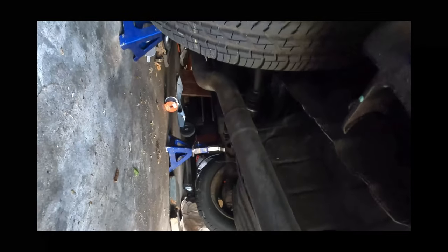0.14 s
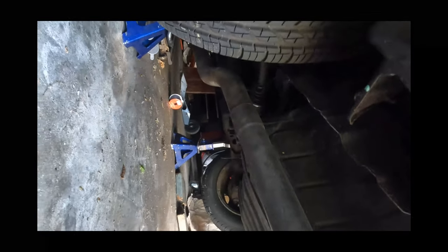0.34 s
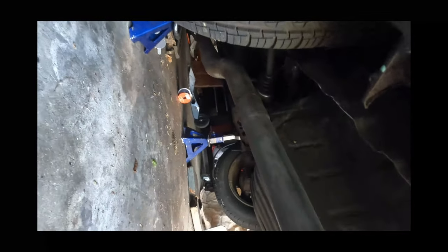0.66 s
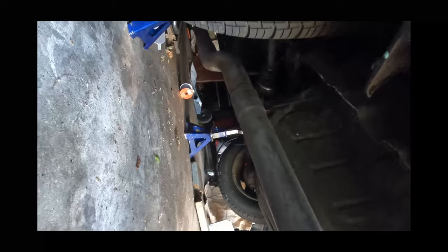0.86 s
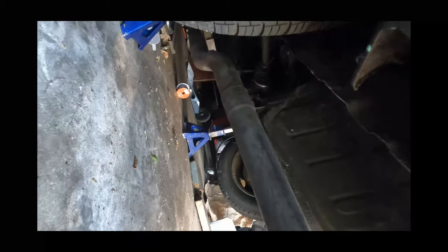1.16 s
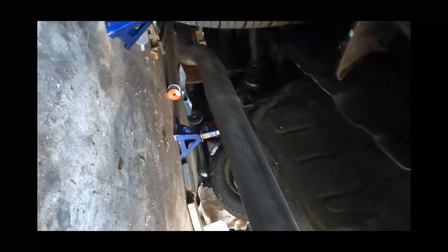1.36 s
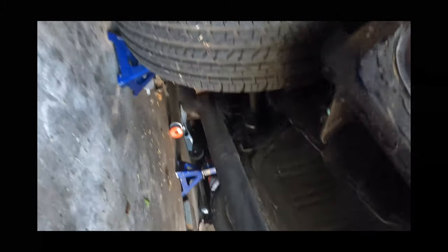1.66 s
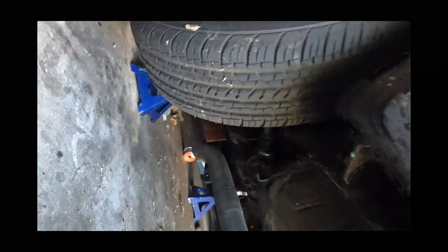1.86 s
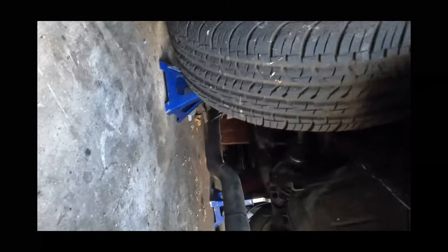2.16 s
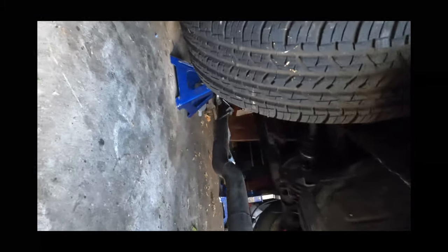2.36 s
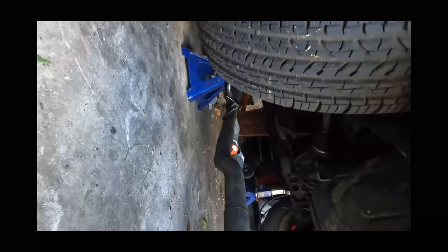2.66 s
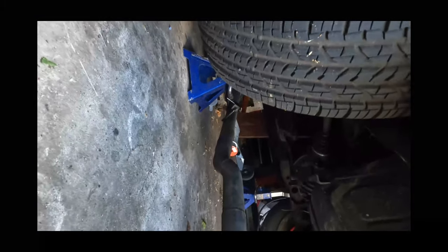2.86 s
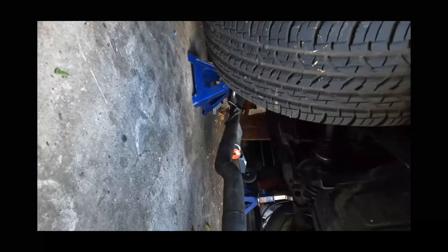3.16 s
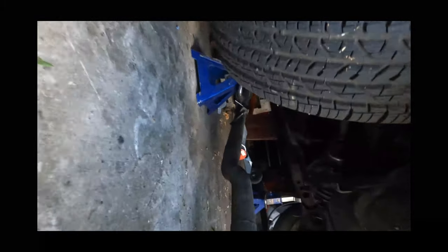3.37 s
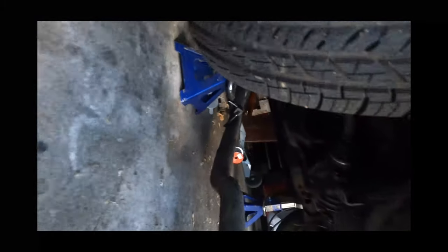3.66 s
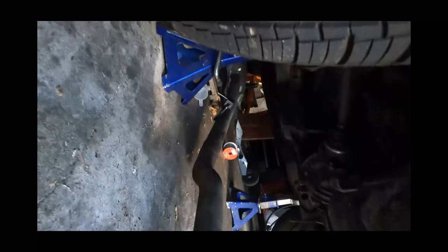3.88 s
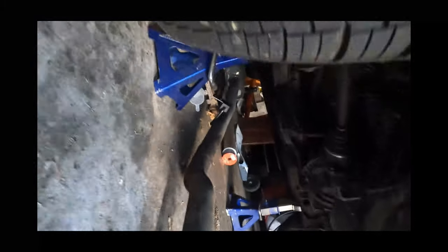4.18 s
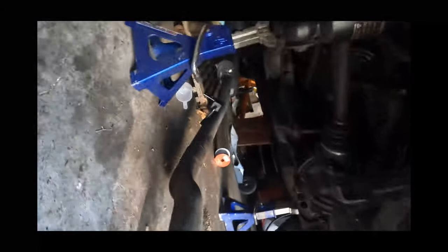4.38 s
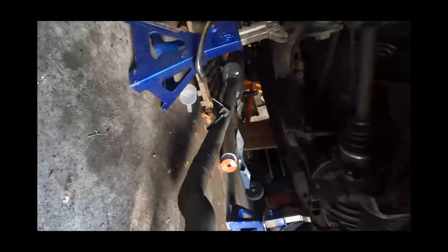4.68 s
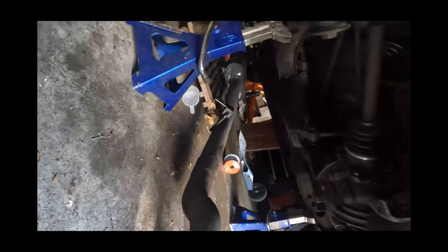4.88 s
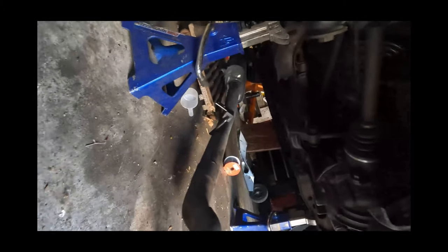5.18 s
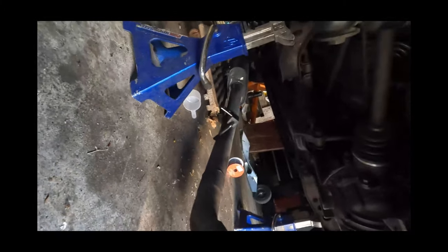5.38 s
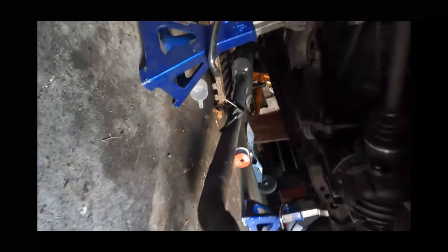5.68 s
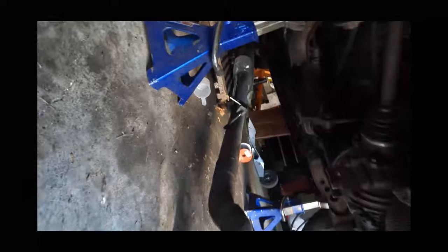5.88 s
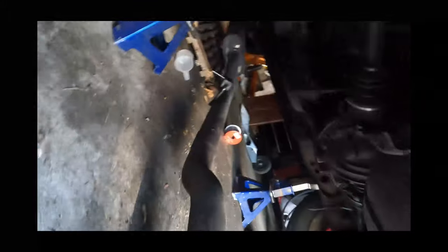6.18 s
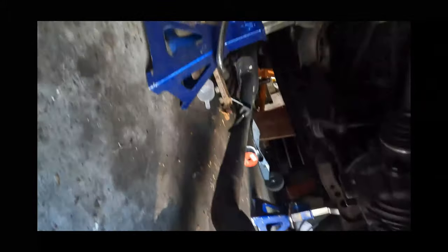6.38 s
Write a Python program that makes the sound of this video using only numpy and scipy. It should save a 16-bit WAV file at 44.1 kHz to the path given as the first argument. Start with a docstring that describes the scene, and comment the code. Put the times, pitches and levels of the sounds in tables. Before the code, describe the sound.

Close up under a car in a small garage, a long steel pipe is worked loose. Soft bumps and faint high chirps come first, then sharp metallic clanks and a brief piercing shriek. Rusty rubbing and dull thuds follow, a hollow boom near the middle, then heavy clanks and coarse scrapes over concrete. Quiet air and a short room tail surround it.

```python
"""A steel exhaust pipe is twisted out of its joint under a car, knocks about and is dragged over a garage floor.
The pipe booms in decaying low modes when it bumps; it clanks in bursts of tiny impacts when it meets metal.
The tight joint chirps, whistles, squeaks and shrieks: stick-slip drives a few unsteady sine modes.
Rusty steel rubs and sings hoarsely, and pulls over concrete end the job: all are coloured random grains.
A low hum of the pipe and a steady bed of air lie beneath, and bumps, clanks and friction ring in the garage."""
import sys
import numpy as np
from scipy import signal
from scipy.fft import rfft, irfft
from scipy.io import wavfile
from scipy.ndimage import uniform_filter1d

SR = 44100
rng = np.random.default_rng(int(sys.argv[2]) if len(sys.argv) > 2 else 0)


def transcribe(u):
    """Save the signal u as a 16-bit wav file named by the first command-line argument.

    u: samples, shape (n,) or (channels, n), limited to [-1, 1]; the rate is SR.
    q: integer samples, one column per channel.
    """
    v = np.clip(np.atleast_2d(u).T, -1, 1)
    q = np.round(v * 32767).astype(np.int16)
    wavfile.write(sys.argv[1], SR, q)


N = 288414
TIME = np.arange(N) / SR
RUB_RISE_DB_PER_S, RUB_FALL_DB_PER_S = 435, 310  # shared by rubbing and singing rust

# The pipe's low modes: pitch_hz, relative level_db, t60_s
PIPE_MODES = [(122, -13.5, 0.63), (155, -2.5, 0.25), (179, -20, 0.99), (202.7, 0, 0.13), (236, -10, 0.56),
              (262, 3, 0.079), (280, 0, 0.09), (320, -6, 0.15), (377, -13.5, 0.25), (445.7, -4.5, 0.089),
              (462.4, -6.5, 0.17), (545, -24, 0.24), (596.7, 4, 0.073), (650, 8, 0.052), (744, -20.5, 0.33),
              (806, -12.5, 0.21), (1003, 0, 0.075), (1194, -7, .16)]
# Dense ringing of the pipe's thin wall: frequency_hz, relative level_db
WALL_SPECTRUM = [(60, -18), (150, 1), (300, -5), (600, 2), (900, -3), (1300, -4), (1650, -1.5),
                 (2200, -2.5), (3000, -0.5), (4500, 0), (7000, -3.5), (8800, -14.5), (10000, -8.5),
                 (11300, 1.5), (13000, -16.5), (14000, -24)]


def amp(db):
    """Decibels to gain."""
    return 10 ** (np.asarray(db) / 20)


def unit(x):
    """Scales to rms 1."""
    return x / np.sqrt(np.mean(x ** 2) + 1e-20)


def read(points, hz):
    """Reads a spectrum on a log-frequency axis."""
    f, value = np.transpose(points)
    return np.interp(np.log(hz + 1), np.log(f + 1), value)


def shaped(x, gain):
    """Causal minimum-phase filter whose magnitude is the function gain(Hz)."""
    size = 4096
    hz = abs(np.fft.fftfreq(size, 1 / SR))
    log_gain = np.log(np.maximum(gain(hz), 1e-5))
    taps = np.fft.ifft(np.exp(np.conj(signal.hilbert(log_gain)))).real
    return signal.oaconvolve(x, taps[:size // 2])[:len(x)]


def wander(count, hz):
    """Smooth random drift of rms 1, with its spectrum rolling off around hz."""
    f = np.fft.rfftfreq(count, 1 / SR)
    noise = rfft(rng.standard_normal(count))
    return unit(irfft(noise * np.exp(-(f / hz) ** 2), count))


def add(mix, s, sound):
    """Lays a sound into the mix at time s."""
    part = mix[max(round(s * SR), 0):][:len(sound)]
    part += sound[:len(part)]


def garage(x, wet_db):
    """Adds a diffuse noise tail in which each band dies at its own speed."""
    # Reverberation of the garage: frequency_hz, t60_s
    band_t60 = [(100, 0.27), (300, 0.33), (1000, 0.16), (3000, 0.19), (7000, 0.13), (13000, 0.22)]
    hz, t, z = signal.stft(rng.standard_normal(SR * 3 // 4), SR, nperseg=256)
    decay = amp(-60 * t / read(band_t60, hz)[:, None])
    build_up = 1 - np.exp(-t / 0.022)
    tail = signal.istft(z * decay * build_up, SR, nperseg=256)[1]
    return x + amp(wet_db) * signal.oaconvolve(x, tail / np.linalg.norm(tail))[:len(x)]


def air():
    """Steady filtered noise gives the garage its quiet air."""
    # Colour of the air: frequency_hz, relative level_db
    air_colour = [(15, -61), (25, -11.5), (122, 2), (177, -17), (257, -9.5), (448, -4.5), (2710, -15),
                  (7820, -42), (11900, -23), (14000, -80)]
    noise = rng.standard_normal(N)
    return amp(-64.5) * unit(shaped(noise, lambda f: amp(read(air_colour, f))))


def low_hum(level_db=-4, width_hz=9):
    """The pipe's lowest modes hum softly, rising and falling: noise through narrow resonances."""
    # Hum under the bumps, ahead of the overall level: time_s, level_db
    hum_levels = [(0.0, -35), (0.16, -42.5), (0.42, -55), (0.98, -64.5), (1.44, -45.5), (1.73, -59.5),
                  (2.68, -51), (2.97, -68), (3.99, -47), (4.13, -50), (4.39, -52.5), (4.83, -32.5),
                  (5.06, -52.5), (5.28, -52), (5.39, -58), (5.99, -50.5), (6.45, -42), (6.54, -50.5)]

    def modes(f):
        peaks = sum(amp(db) / (1 + ((f - hz) / width_hz) ** 2) for hz, db, _ in PIPE_MODES)
        return peaks / (1 + (f / 230) ** 4)

    hum = unit(shaped(rng.standard_normal(N), modes))
    return hum * amp(level_db + np.interp(TIME, *np.transpose(hum_levels)))


def strokes(rows, rise_db_per_s, fall_db_per_s, grind_db, hiss_db):
    """Levels of grinding, rasp and fine hiss: each stroke fades up, swells or eases, then dies away."""
    power = np.zeros((3, N))
    for s, length, level_db, swell_db, bright_db in rows:
        near = abs(TIME - s) < 1
        t = TIME[near] - s
        held_db = level_db + swell_db * (np.clip(t / length, 0, 1) - 0.5)
        fade_in_db = rise_db_per_s * np.maximum(-t, 0)
        fade_out_db = fall_db_per_s * np.maximum(t - length, 0)
        envelope = amp(held_db - fade_in_db - fade_out_db)
        # a brighter stroke has less grinding and more hiss
        tilt = amp([grind_db - bright_db, 0, hiss_db + bright_db])
        for band, gain in zip(power, tilt):
            band[near] += (gain * envelope) ** 2
    return np.sqrt(power)


def friction(levels, colour, grains_per_s, grain_db, judder_db, patchy_db, level_db):
    """Grains of rust and grit break under the sliding pipe, in uneven clumps."""
    sizes = amp(grain_db * np.minimum(rng.exponential(1, N), np.pi))
    grains = rng.standard_normal(N) * sizes * (rng.random(N) < grains_per_s / SR)
    clumps = grains * amp(judder_db * wander(N, 60))
    sound = garage(shaped(clumps, lambda f: amp(read(colour, f))), wet_db=-11.5)
    # as the contact slides along, different wall modes swell and fade
    hz, _, z = signal.stft(sound, SR, nperseg=1024, noverlap=768)
    patches = uniform_filter1d(rng.standard_normal(z.shape), size=4, axis=0)
    patches = unit(uniform_filter1d(patches, size=16, axis=1))
    z = z * amp(patchy_db * patches)
    # grinding below 1800 Hz, rasp up to 5500 Hz, hiss above
    band = np.searchsorted([1800, 5500], hz)[:, None]
    parts = [unit(signal.istft(z * (band == k), SR, nperseg=1024, noverlap=768)[1][:N]) for k in range(3)]
    return amp(level_db) * np.sum(levels * parts, axis=0)


def rubbing():
    """Rusty steel rubs in short pushes that break dense grains."""
    # Pushes: start_s, length_s, relative level_db, swell over the push_db, brightness_db
    pushes = [(0, 0.083, -55.5, -7, -2.5), (.12, 0.077, -59, -4, 2), (.54, 0.16, -58, 0, 0.5),
              (.69, 0.079, -46, -2, 2), (.8, 0.31, -47, -1, 0), (1.16, 0.19, -46.5, 6.5, -0.5),
              (1.41, 0.069, -48.5, 2, 4.5), (1.57, 0.077, -42, -12, 3.5), (1.742, 0.085, -51.5, -7.5, 3),
              (1.92, 0.18, -54.5, 8.5, 1), (2.15, 0.078, -48.5, -1.5, 1), (2.31, 0.13, -58, 13, 0),
              (2.48, 0.08, -48, -5, 6.5), (2.675, 0.072, -49.5, 7.5, 1.5), (2.88, 0.23, -49.5, 9.5, 1),
              (3.18, 0.076, -45.5, 2.5, 0), (3.33, 0.06, -40, -1, 0.5), (3.42, .12, -40, 2, 6.5),
              (3.57, 0.16, -47, -5, -0.5), (3.74, 0.21, -45, 7.5, 4), (3.93, 0.078, -34, -0.5, -1),
              (4.19, 0.039, -39, 12, -1), (4.27, 0.064, -41.5, 1, 0.5), (4.385, 0.022, -42.5, 1, 1),
              (4.475, 0.091, -45.5, -10.5, 4), (4.58, 0.098, -52, -2, 2), (4.685, 0.14, -48.5, -9.5, 1.5),
              (4.84, 0.35, -59, 4, 3), (5.23, 0.24, -52.5, 9.5, 0), (5.55, 0.13, -55, 4, 6),
              (6.19, 0.064, -52, 13, 0)]
    # Colour of the rub: frequency_hz, relative level_db
    rub_colour = [(40, -37), (100, -19.5), (260, 0.5), (700, 0.5), (1100, 0.5), (1900, 0), (2500, 0),
                  (3700, -3), (5000, -7), (7100, -13), (8500, -24.5), (11000, -19.5), (13400, -39),
                  (14200, -44.5)]
    levels = strokes(pushes, RUB_RISE_DB_PER_S, RUB_FALL_DB_PER_S, grind_db=0.5, hiss_db=-13)
    return friction(levels, rub_colour, grains_per_s=16000, grain_db=4.0,
                    judder_db=1.5, patchy_db=2, level_db=-1.5)


def singing():
    """In a few pushes the rust sings hoarsely: grains through peaks in the treble."""
    # Singing pushes: start_s, length_s, relative level_db, swell over the push_db, brightness_db
    sung_pushes = [(1.73, 0.11, -59.5, -6, -6.5), (2.46, .13, -63, 0, 4), (2.67, 0.073, -50, 1, -1),
                   (2.81, .12, -58.5, 7, 4.5)]
    # Colour of the singing: frequency_hz, relative level_db
    sing_colour = [(500, -43.5), (2100, -20), (2650, -3), (3150, -3), (3800, -16.5), (5100, -15),
                   (5650, -8), (6500, -20), (9000, -37.5)]
    levels = strokes(sung_pushes, RUB_RISE_DB_PER_S, RUB_FALL_DB_PER_S, grind_db=-18, hiss_db=-7)
    return friction(levels, sing_colour, grains_per_s=12000, grain_db=-2,
                    judder_db=2.0, patchy_db=0.5, level_db=2)


def dragging():
    """Pulls over concrete break sparser grit with a heavier, darker grind."""
    # Pulls, the first of which catches and slides on:
    # start_s, length_s, relative level_db, swell over the pull_db, brightness_db
    pulls = [(5.71, 0.2, -30.5, 5.5, 1.5), (5.99, 0.14, -38.5, -8.5, 0.5), (6.32, 0.12, -27.5, 1, 0.5)]
    # Colour of the drag: frequency_hz, relative level_db
    drag_colour = [(60, -22), (240, -0.5), (450, 1), (630, 6.5), (1200, 1.5), (1600, -1), (3300, -4.5),
                   (5000, -12), (7000, -20.5), (8700, -31.5), (11100, -24.5), (12000, -33), (13000, -42),
                   (14000, -47)]
    levels = strokes(pulls, rise_db_per_s=421.5, fall_db_per_s=177, grind_db=2.5, hiss_db=-13)
    return friction(levels, drag_colour, grains_per_s=7000, grain_db=-1.04,
                    judder_db=0.5, patchy_db=2, level_db=2)


def slip(length, level_db, group, rise=0.0026, t60=0.055, linger_db=-17, linger_t60=0.25,
         waver_hz=11, flutter_db=3.0, sag_hz_per_s=3500, sag_time=0.023):
    """Stick-slip feeds a few modes of the joint; when it lets go they die down, then linger faintly."""
    # Mode groups of the joint, by name: pitch_hz, relative level_db
    joint_modes = {"chirp": [(11761, -5), (12238, -10)], "whistle": [(12800, -7.5), (11100, -19)],
                   "squeak": [(3930, -3.5), (4018, 15.5), (4125, -3), (4196, -5), (4300, 0), (7505, -22)],
                   "shriek": [(4018, 5), (4196, -6), (5970, -23), (6530, -18.5), (7240, -12), (7505, -19),
                   (9841, -24.5), (10370, -30.5), (11350, -15), (11760, -49.5), (12250, -24), (12660, -40)]}
    t = np.arange(SR // 2) / SR
    since = np.maximum(t - length, 0)
    release = amp(-60 * since / t60) + amp(linger_db - 60 * since / linger_t60)
    drive = (1 - np.exp(-t / rise)) * release
    # a squeak never quite locks on, and it slides down on to its modes
    squeaks = group == "squeak"
    unsteady_hz = 55 if squeaks else waver_hz
    sharp_hz = squeaks * sag_hz_per_s * np.maximum(sag_time + length / 2 - t, 0)
    tone = 0
    for hz, db in joint_modes[group]:
        pitch_hz = hz + sharp_hz + unsteady_hz * wander(len(t), 100)
        tone = tone + amp(db) * np.sin(2 * np.pi * np.cumsum(pitch_hz) / SR)
    return amp(level_db + flutter_db * wander(len(t), 120)) * drive * unit(tone)


def joint_slips():
    """The tight joint slips again and again, each time locking on to one group of its modes."""
    # Slips: start_s, length_s, level_db, mode group
    slip_rows = [(0.275, 0.1, -53.5, "chirp"), (0.278, 0.036, -49, "whistle"),
                 (0.51, 0.053, -47, "whistle"), (0.559, 0.21, -55, "whistle"), (0.7, 0.029, -21.5, "chirp"),
                 (0.76, 0.015, -50, "chirp"), (0.844, 0.045, -49.5, "chirp"), (0.902, 0.028, -44, "chirp"),
                 (0.935, 0.0091, -36, "chirp"), (1.113, 0.0083, -43.5, "whistle"),
                 (1.125, 0.009, -40, "chirp"), (1.154, 0.013, -38, "chirp"),
                 (1.184, 0.035, -46.5, "squeak"), (1.25, .06, -46, "squeak"), (1.325, 0.012, -40, "squeak"),
                 (1.373, 0.012, -29, "chirp"), (1.396, 0.034, -52, "chirp"), (1.509, 0.041, -13, "shriek")]
    mix = np.zeros(N)
    for s, *row in slip_rows:
        add(mix, s, slip(*row))
    return garage(mix, wet_db=-42.5)


def bump(level_db, bright_hz, favoured_hz, freedom, favour_db=9, rattle_db=-13, rattle_t60=0.29,
         push_db=-5, push_time=0.0015, deepest=0.41):
    """A padded blow shoves the pipe and rings its low modes; the duller it is, the fewer answer."""
    t = np.arange(SR * 3 // 4) / SR
    ring = 0
    for k, (hz, db, t60) in enumerate(PIPE_MODES):
        # the place of the blow decides which modes take most of it; they start out of step
        share_db = favour_db / (1 + (np.log(hz / favoured_hz) / 0.021) ** 2)
        decay = amp(db + share_db - 60 * t / (t60 * freedom))
        ring = ring + decay * np.sin(2 * np.pi * hz * t + k * k)

    def rattle_colour(f):
        return amp(read(WALL_SPECTRUM, f)) / (1 + (f / 1500) ** 2) / (1 + (380 / (f + 1)) ** 4)

    def contact_colour(f):
        treble_cut = 1 + (f / bright_hz) ** 6
        bass_cut = 1 + (deepest * favoured_hz / (f + 1)) ** 3
        return 1 / np.sqrt(treble_cut * bass_cut)

    # higher up the modes crowd into a rattle
    rattle = unit(shaped(rng.standard_normal(len(t)), rattle_colour))
    rattle = 2 * amp(rattle_db - 60 * t / (rattle_t60 * freedom)) * rattle
    # the shove swings one way and back
    push = amp(push_db) * 2 * np.pi * t / push_time * (1 - t / (2 * push_time)) * np.exp(-t / push_time)
    rise = 1.18 / bright_hz  # seconds: dull contacts build up slowly
    blow = (ring + push + rattle) * (1 - np.exp(-t / rise))
    blow = shaped(blow, contact_colour)
    opening_rms = np.sqrt(np.mean(blow[:SR // 30] ** 2))
    return amp(level_db - 3.0) * blow / opening_rms


def pipe_bumps():
    """The long pipe bumps and booms."""
    # Bumps: start_s, relative level_db, contact brightness_hz, favoured mode_hz,
    # freedom to ring (factor on t60)
    bump_rows = [(0.0, -25, 610, 280, 0.99), (.012, -30.5, 190, 155, 0.7), (0.17, -29, 428, 280, 1.7),
                 (0.301, -37.5, 390, 320, 1.14), (1.511, -29.5, 423, 262, 0.35),
                 (2.126, -27.5, 446, 201, 1.8), (2.504, -34.5, 352, 303, 1.2),
                 (2.706, -24.5, 515, 281.6, 1.2), (3.314, -30.5, 650, 227, 1.1),
                 (3.947, -15, 750, 259.7, 1.05), (3.976, -24, 198, 155, 1.07), (4.314, -40, 303, 273, 0.56),
                 (4.52, -32, 300, 250, 0.72), (4.585, -40.5, 264, 262, 0.81), (4.682, -40, 257, 231, 0.57),
                 (4.811, -32.5, 700, 593, 1.6), (4.82, -28, 250, 236, 1.25), (4.823, -27.5, 184, 155, 1.74),
                 (5.221, -36.5, 262, 250, 3.2), (5.393, -23.5, 370, 262, 4.4),
                 (5.469, -16.5, 1020, 750, 0.76), (5.479, -14.5, 555, 262, 0.83),
                 (6.008, -34, 400, 262, 0.38), (6.195, -40, 300, 250, 0.35)]
    mix = np.zeros(N)
    for s, *row in bump_rows:
        add(mix, s, bump(*row))
    return garage(mix, wet_db=-12.5)


def clank(level_db, bright_hz, ring_hz, chatter, t60=0.065, grit_db=-2.5, body=0.92, crack=0.68,
          ring_db=11, ring_width=0.065):
    """A crack and a burst of tiny impacts ring the crowded wall modes, most of all the struck part's own."""
    t = np.arange(SR // 4) / SR
    # the force holds while the contact chatters, then decays
    held = amp(-60 * np.maximum(t - chatter, 0) / t60)
    force = (1 - np.exp(-t / 0.00023)) * (held + crack * np.exp(-t / 0.0066))
    impacts = rng.standard_normal(len(t)) * amp(grit_db * wander(len(t), 1000))

    def colour(f):
        own_db = ring_db / (1 + ((f / ring_hz - 1) / ring_width) ** 2)
        weight = body + 1 / np.sqrt(1 + (ring_hz / (f + 1)) ** 4)
        return amp(read(WALL_SPECTRUM, f) + own_db) * weight / np.sqrt(1 + (f / bright_hz) ** 6)

    # levelled against the same impacts without the force envelope
    return amp(level_db - 13) * shaped(impacts * force, colour) / np.std(shaped(impacts, colour))


def pipe_clanks():
    """The pipe clanks wherever it meets metal."""
    # Clanks: start_s, relative level_db, brightness_hz, struck part's resonance_hz, chatter_s
    clank_rows = [(0.003, -28.5, 3220, 3060, 0.0076), (0.03, -28, 3100, 2840, 0.0046),
                  (0.134, -38.5, 6750, 1490, 0.0089), (0.193, -36.5, 1940, 516, 0.02),
                  (0.2774, -34, 12200, 6500, 0.0009), (0.513, -25, 11800, 2000, 0.0092),
                  (0.641, -27.5, 11300, 2480, 0.0079), (0.6925, -7, 6200, 347, 0.0018),
                  (0.844, -24, 3900, 1600, 0.0086), (1.033, -20.5, 3860, 3020, 0.001),
                  (1.124, -21, 8700, 1320, 0.015), (1.152, -26.5, 6900, 517, 0.012),
                  (1.253, -31, 5460, 3900, 0.0018), (1.368, -6.5, 9000, 1976, 0.01),
                  (1.51, -14.5, 7450, 1370, 0.021), (1.542, -15.5, 7900, 650, 0.019),
                  (2.124, -16, 2190, 1340, 0.0044), (2.126, -20.5, 1490, 1070, 0.031),
                  (2.502, -22.5, 1910, 1410, 0.0043), (3.312, -30.5, 1800, 490, 0.011),
                  (4.042, -19.5, 4920, 1620, 0.00088), (4.169, -34, 4970, 1500, 0.0054),
                  (4.538, -31.5, 7100, 2500, .003), (4.893, -23.5, 3940, 1170, 0.017),
                  (4.914, -23, 2010, 1590, 0.0052), (5.001, -33.5, 4000, 1170, 0.016),
                  (5.03, -41, 11950, 5000, .002), (5.073, -38.5, 9000, 4600, 0.00041),
                  (5.097, -35, 8740, 2800, 0.0022), (5.117, -37, 2930, 1080, 0.0058),
                  (5.391, -13.5, 2620, 1410, 0.026), (5.436, -6, 3260, 1560, 0.02),
                  (5.477, -27.5, 6800, 6530, 0.0038), (6.040, -9, 3830, 1650, 0.015),
                  (6.065, -15.5, 5000, 1140, 0.0032), (6.28, -19, 5000, 594, 0.0033)]
    mix = np.zeros(N)
    for s, *row in clank_rows:
        add(mix, s, clank(*row))
    return garage(mix, wet_db=-12.0)


def scene():
    """Sums all layers and spreads them slightly between the ears, most of all in the top treble."""
    # Side against mid, a quarter turn out of phase: frequency_hz, level_db
    side_levels = [(40, -25), (150, -56), (2000, -67.5), (5000, -38), (8000, -25), (11000, -16),
                   (13000, 2.5)]
    # Left against right: frequency_hz, level_db
    left_right_balance = [(7000, 0), (10000, -0.65), (13000, -1.5)]
    mix = air() + low_hum() + rubbing() + singing() + dragging()
    mix = mix + joint_slips() + pipe_bumps() + pipe_clanks()
    hz = np.fft.rfftfreq(N, 1 / SR)
    left_over_right = amp(read(left_right_balance, hz))
    balance = (left_over_right - 1) / (left_over_right + 1)
    side = irfft(rfft(mix) * (1j * amp(read(side_levels, hz)) + balance), N)
    return np.array([mix + side, mix - side])


def record(dry, notch_hz=9050, notch_width_hz=110, notch_db=-17):
    """A narrow dip in the treble, then a steep low-pass at 14.1 kHz."""
    def notch(f):
        return amp(notch_db / (1 + ((f - notch_hz) / notch_width_hz) ** 2))

    heard = np.array([shaped(x, notch) for x in dry])
    low_pass = signal.firwin(255, 14100, window=("kaiser", 9), fs=SR)
    return signal.oaconvolve(heard, low_pass[None], "same")


dry = scene()
out = record(dry)
transcribe(out)
```